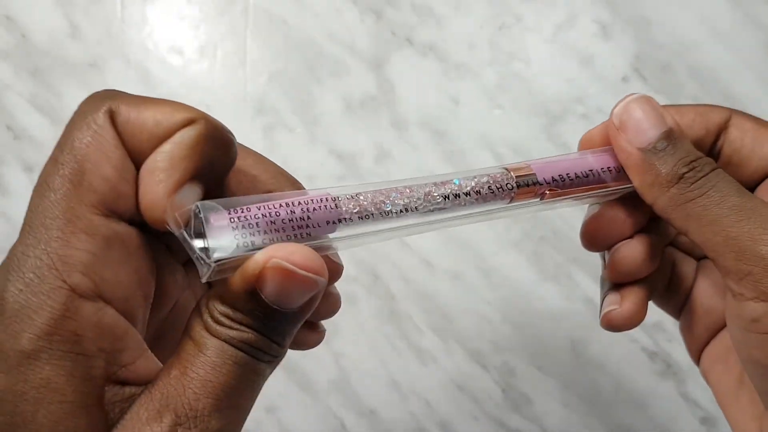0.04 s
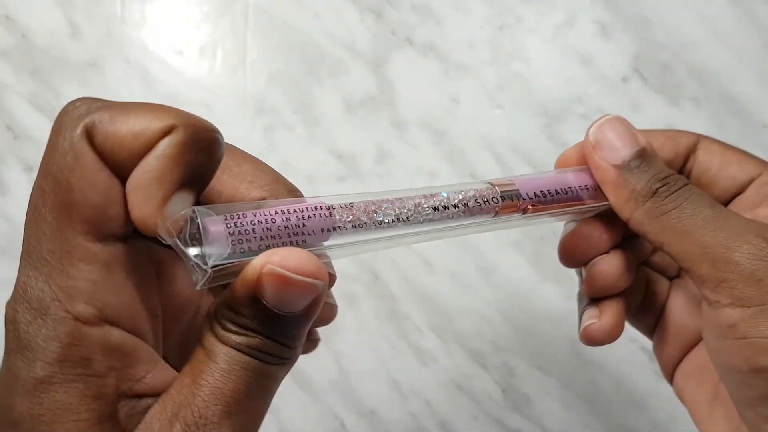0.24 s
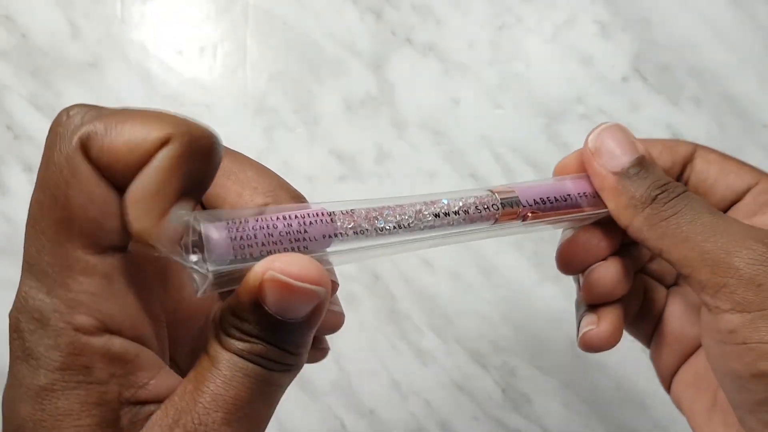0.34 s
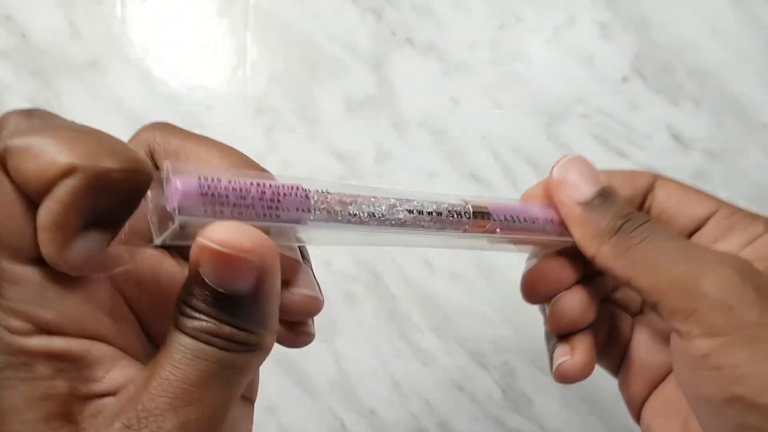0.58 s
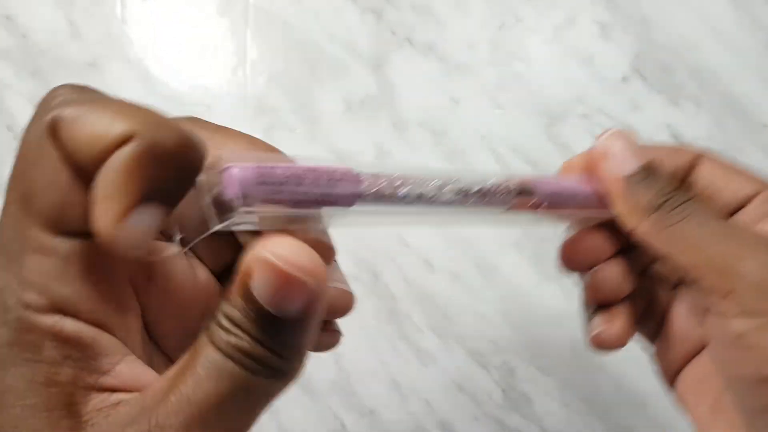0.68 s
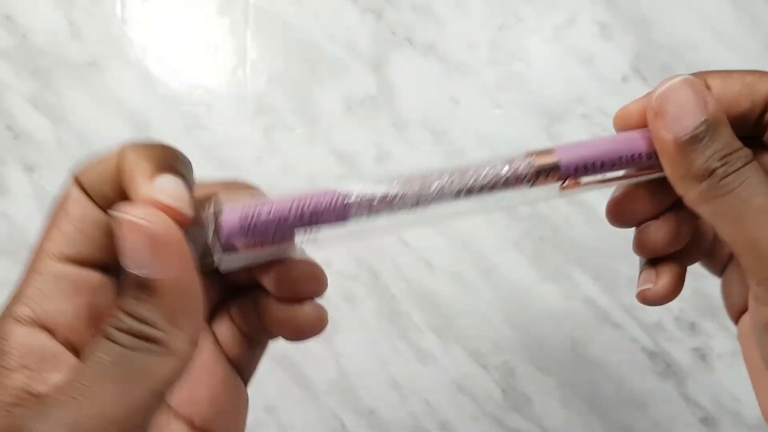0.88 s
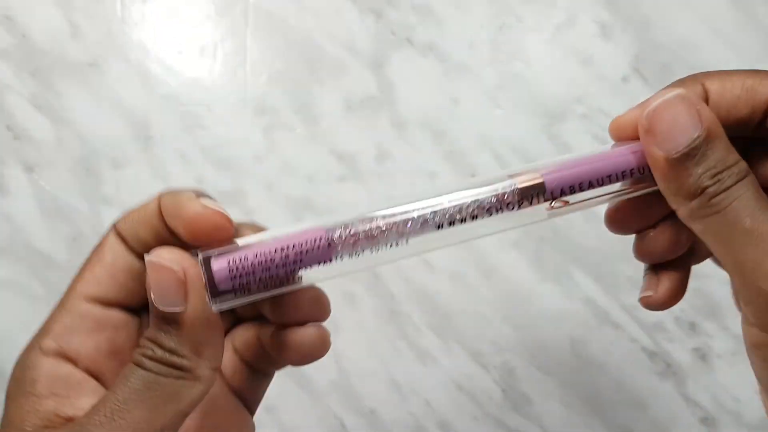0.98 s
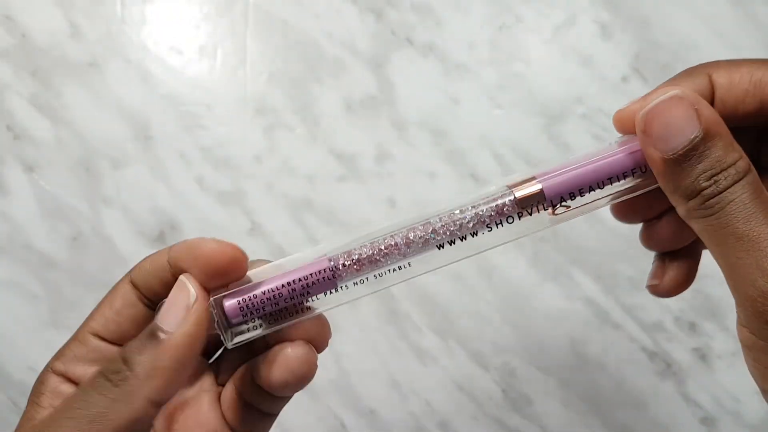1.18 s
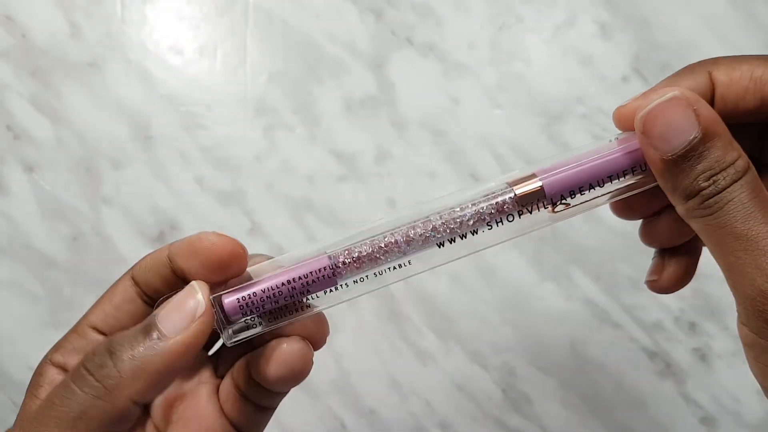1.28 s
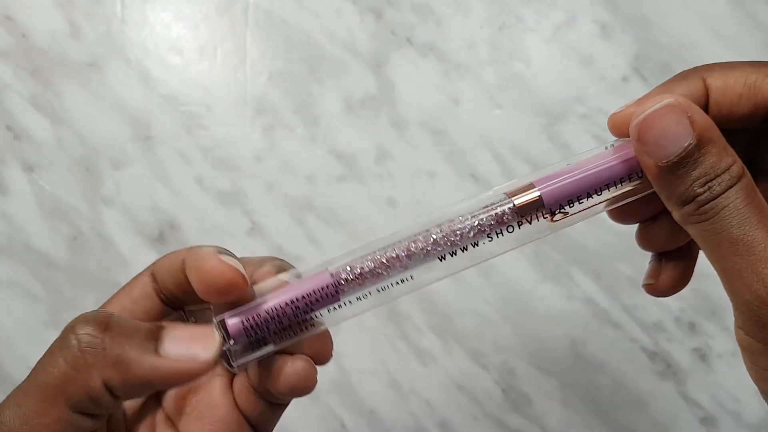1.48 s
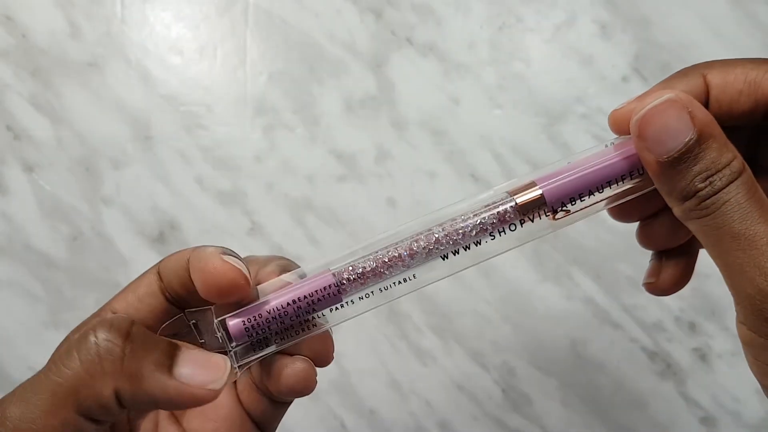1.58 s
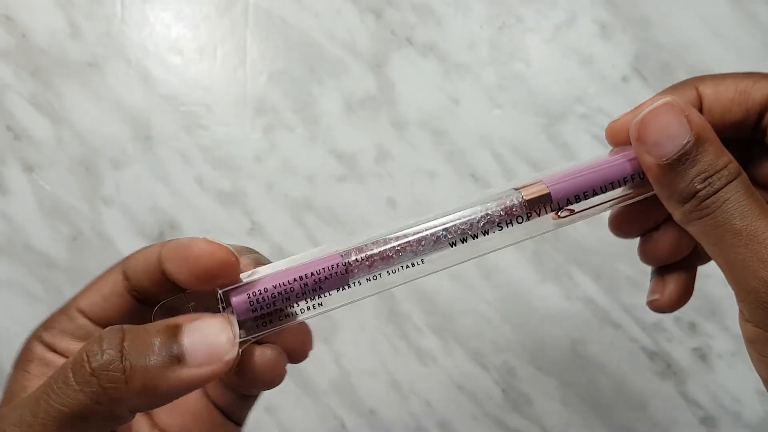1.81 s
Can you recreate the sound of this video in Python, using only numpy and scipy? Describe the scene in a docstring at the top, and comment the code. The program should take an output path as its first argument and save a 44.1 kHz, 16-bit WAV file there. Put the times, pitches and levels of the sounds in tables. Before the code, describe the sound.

Thin clear plastic box snaps sharply under fingernails, then faint ticks and finger rubs follow

```python
"""A low appliance drone over hiss and the dying room ring of a snap; then fingernails pry at a box flap.
The thin clear plastic pen box is held close to a phone: its buckling sheet snaps, slips driving decaying modes.
Rattles are fading showers of slips, finger slides gliding bands of noise grains, a faint thin tone narrow noise.
A small hard room answers with decaying noise bands; drone and hiss are shaped noise."""
import sys
import numpy as np
from scipy import signal
from scipy.fft import rfft, irfft
from scipy.io import wavfile
from scipy.ndimage import uniform_filter1d

SR = 44100
rng = np.random.default_rng(int(sys.argv[2]) if len(sys.argv) > 2 else 0)


def convert_level_to_amplitude(level_db):
    """Map a level in decibels to its linear amplitude factor."""
    exponent = np.asarray(level_db, float) / 20
    return 10 ** exponent


def inscribe(sig):
    """Save sig as 16-bit PCM at rate SR to the path in sys.argv[1].

    A 1-D sig is mono; a 2-D sig holds one channel per row.
    Samples are clipped to [-1, 1] before scaling.
    """
    pcm = np.round(np.clip(np.atleast_2d(sig).T, -1, 1) * 32767)
    wavfile.write(sys.argv[1], SR, pcm.astype(np.int16))


N = 81585
LEAD_S = 0.1  # time computed ahead of the start, then cut
RIGHT_SIGN = np.array([[1], [-1]])
IS_RIGHT = np.array([[0], [1]])  # right = far port


def unit(x):
    """Scales to rms 1."""
    return x / np.sqrt(np.mean(x ** 2))


def band(x, center_hz, width_hz):
    """Two-pole resonance, gain 1 at the centre."""
    center_hz_safe = min(center_hz, 0.45 * SR)
    b, a = signal.iirpeak(center_hz_safe, center_hz / width_hz, fs=SR)
    return signal.lfilter(b, a, x)


def double_band(x, center_hz, width_hz):
    """The same resonance twice, for steeper skirts."""
    return band(band(x, center_hz, width_hz), center_hz, width_hz)


def walk(rate_hz):
    """Random levels held 1 / rate_hz and slewed twice."""
    hold = int(SR / rate_hz)
    levels = np.repeat(rng.standard_normal(N // hold + 1), hold)
    slewed = uniform_filter1d(uniform_filter1d(levels, hold), hold)
    return 2.1 * slewed[:N]


def start_index(start_s):
    """Sample index of a time, counted from the start of the lead."""
    return int((start_s + LEAD_S) * SR)


# Colour of air and microphone hiss. Each row: frequency in Hz, relative density in dB per Hz.
HISS_COLOUR = [(15, -35), (26, -7.5), (56, 5.5), (152, 1), (215, 2), (320, 0.5), (495, -2.5), (780, -10.5),
               (1300, -14.5), (2050, -12), (3200, -17), (5000, -22.5), (8000, -30), (10000, -31),
               (13000, -24.5), (16200, -26)]
# Narrow wavering bands of the drone. Each row: centre in Hz, filter width in Hz, level in dB before the waver.
DRONE_BANDS = [(113, 13, -68), (146, 22, -67.5), (284, 37, -73.5)]


def background():
    """Air and microphone hiss, more alike in the bass, with the wavering noise bands of an appliance."""
    hiss_db, alike_below_hz, right_db, waver_db = -64, 900, -0.5, 3.1
    hz = np.maximum(np.fft.rfftfreq(N, 1 / SR), 1)
    colour_hz, colour_db = np.array(HISS_COLOUR).T
    colour = convert_level_to_amplitude(np.interp(np.log(hz), np.log(colour_hz), colour_db))
    mid, side = rfft(rng.standard_normal((2, N))) * colour
    side = side * np.clip(hz / alike_below_hz, 0.4, 1)
    out = convert_level_to_amplitude(hiss_db) * unit(irfft(np.array([mid + side, mid - side]), N))
    for center_hz, width_hz, db in DRONE_BANDS:
        noise = rng.standard_normal(N) + 0.3 * rng.standard_normal((2, N))
        level = convert_level_to_amplitude(db + waver_db * walk(5))
        out = out + level * unit(double_band(noise, center_hz, width_hz))
    return out * convert_level_to_amplitude(IS_RIGHT * right_db)


# Room tail. Each row: band centre in Hz, level in dB before doubling, t60 in seconds.
ROOM_BANDS = [(150, -53, 0.065), (401, -43, 0.23), (1000, -52, 0.26), (1940, -51, 0.25), (3060, -47, 0.23),
              (5100, -55, 0.33), (8900, -56.5, 0.29), (14010, -49, .21)]


def room(x):
    """Diffuse tail that starts at the first wall, each band dying at its own rate."""
    wall_s, wide_above_hz = 0.0027, 800
    t = np.arange(int(0.5 * SR)) / SR
    tail = 0
    for hz, db, t60_s in ROOM_BANDS:
        mid, side = rng.standard_normal((2, len(t)))
        noise = mid + min(hz / wide_above_hz, 1) * side * RIGHT_SIGN
        decay = 1000.0 ** (-t / t60_s)
        tail = tail + 2 * convert_level_to_amplitude(db) * double_band(noise, hz, 0.9 * hz) * decay
    tail = tail * np.clip(t / wall_s - 0.5, 0, 1)
    crossed = x.mean(axis=0, keepdims=True) + 0.5 * x[::-1]
    return signal.fftconvolve(crossed, tail, axes=1)[:, :x.shape[1]]


def ring(modes, slips):
    """Modes driven by slips, each with its own share of the energy; out at 0 dB if packed into 5 ms."""
    detune_share, scatter_db, right_late_s = 0.015, 1.2, 0.00016
    t = np.arange(slips.shape[1]) / SR
    hz, db, t60_s = np.array(modes, float).T[:, :, None]
    hz = hz * (1 + detune_share * rng.standard_normal(hz.shape))
    age_s = np.maximum(t - right_late_s * IS_RIGHT[:, :, None], 0)
    response = np.sin(2 * np.pi * hz * age_s) * 1000.0 ** (-age_s / t60_s)
    # axes: port, mode, time
    rung = signal.fftconvolve(response, slips[:, None], axes=2)[..., :len(t)]
    rung = rung / np.sqrt((rung ** 2).sum(axis=2, keepdims=True))
    sign = (-1.0) ** np.arange(len(modes))[:, None]
    level = convert_level_to_amplitude(db + scatter_db * rng.standard_normal((2, len(modes), 1)))
    hit = (sign * level * rung).sum(axis=1)
    return hit / np.sqrt((hit ** 2).sum(axis=1, keepdims=True) / (SR / 200))


# Modes of the box, low to high. Each row: frequency in Hz, relative level in dB, t60 in seconds.
THUD_MODES = [(151, -7, 0.0096), (324, -1, 0.0063), (664, 3.5, 0.0059)]
HOLLOW_MODES = [(813.5, -3, .009), (1090, -3.5, 0.0057), (1457, 1.5, 0.025), (1786, 1, 0.014)]
SHEET_MODES = [(2235, -3, 0.0089), (2474, -1.5, .006), (3208, 1, 0.0073), (3437, 0.5, .006),
               (4320, -9, 0.0029)]
CRACK_MODES = [(5320, -1, 0.002), (6550, -3, 0.0056), (7140, 0.5, 0.0014), (9500, 0.5, 0.0018),
               (10850, -3, 0.0033), (12710, -8.5, 0.0015), (13725, -6.5, 0.0065), (13800, -3, 0.00078)]
# Snaps and ticks of the sheet. Each row: start in seconds, level of the sheet modes in dB,
# then thud, hollow ring and bright crack in dB against that level.
SNAP_EVENTS = [(-.061, -24, -24, -8.5, -11), (0.2269, -17.5, -54, -11, -24.5),
               (0.2673, -19, -20.5, -4.5, -17.5), (0.3957, -18.5, -24.5, -17, -13.5),
               (0.3992, -24, -27.5, -11, 6), (0.5468, -19.5, -17, -13.5, -1.5), (.5498, -19, -12, -8, 2),
               (.5619, -33.5, -17, -11.5, -2.5), (.5749, -37, -11, -4, -2.5), (0.7278, -59, -17.5, -3.5, 1),
               (0.8817, -56, -16.5, 1.5, -1.5), (0.979, -51.5, -15, -2, -7.5),
               (1.0309, -64.5, -22.5, -1.5, -6.5), (1.1328, -64, -24, -11, -13), (1.2476, -63, 1.5, 4, -8),
               (1.2633, -65, -8.5, -1.5, 0.5), (1.2789, -61, -17, -7, -8), (.9545, -59.5, -15.5, -10, -2.5),
               (1.3522, -55.5, -1, 2.5, -1), (1.3628, -58, -1, 4, -6), (1.368, -61, 8.5, -3.5, -8),
               (1.6419, -67, -1.5, 1.5, -2), (1.7053, -67, -6.5, 4.5, -13.5),
               (1.7193, -35.5, -16, -11.5, -3.5), (1.8369, -56, -2.5, -0.5, -12)]


def snaps(size):
    """Each snap is a sudden slip and a few ms of smaller ones, ringing the box."""
    crumple_s, crumple_db, crumple_per_s = 0.0046, -4, 2600  # smaller slips: fade time, peak level, rate
    right_own = 0.82  # share of the small slips that only the far port hears
    right_db, right_thud_db, right_crack_db = -1, -3, -6.5  # thud and crack on top of right_db
    mic_low_hz = 70
    out, t = np.zeros((2, size)), np.arange(int(0.04 * SR)) / SR
    for start_s, db, thud_db, hollow_db, crack_db in SNAP_EVENTS:
        chance, strength = rng.random((2, 2, len(t)))
        slips = (chance < crumple_per_s / SR) * (2 * strength - 1) * convert_level_to_amplitude(crumple_db)
        slips[1] = slips[0] + right_own * (slips[1] - slips[0])
        slips[:, 0] = 1  # the sudden slip
        low = slips * np.exp(-(t / crumple_s) ** 4)
        high = slips * np.exp(-t / (0.7 * crumple_s))
        hit = convert_level_to_amplitude(thud_db + IS_RIGHT * right_thud_db) * ring(THUD_MODES, low)
        hit = hit + convert_level_to_amplitude(hollow_db) * ring(HOLLOW_MODES, low)
        hit = hit + ring(SHEET_MODES, low)
        hit = hit + convert_level_to_amplitude(crack_db + IS_RIGHT * right_crack_db) * ring(CRACK_MODES, high)
        i = start_index(start_s)
        n = min(len(t), size - i)
        out[:, i:i + n] += convert_level_to_amplitude(db + IS_RIGHT * right_db) * hit[:, :n]
    low_cut = signal.butter(2, mic_low_hz, "high", fs=SR, output="sos")
    return signal.sosfilt(low_cut, out)


# The freed flap rattles on after the big snaps. Each row: start in seconds, level of the sheet modes in dB,
# crack in dB against it, t60 of the slips in seconds.
RATTLE_EVENTS = [(.401, -37, -0.5, .08), (.553, -26.5, 4.5, 0.16)]


def rattles(size):
    """A fading shower of tiny slips through the sheet, hollow and crack modes."""
    grain_db, hollow_db = 5.5, -4.5
    out, t = np.zeros((2, size)), np.arange(int(0.12 * SR)) / SR
    for start_s, db, crack_db, t60_s in RATTLE_EVENTS:
        bursts = convert_level_to_amplitude(grain_db * rng.exponential(size=len(t)))
        slips = rng.standard_normal((2, len(t))) * bursts * 1000.0 ** (-t / t60_s)
        hit = ring(SHEET_MODES, slips)
        hit = hit + convert_level_to_amplitude(hollow_db) * ring(HOLLOW_MODES, slips)
        hit = hit + convert_level_to_amplitude(crack_db) * ring(CRACK_MODES, slips)
        i = start_index(start_s)
        out[:, i:i + len(t)] += convert_level_to_amplitude(db) * hit
    return out


# Skin sliding on the sheet. Each row: start in seconds, length in seconds, first centre in Hz,
# last centre in Hz, filter width as share of the centre, level in dB before the swell.
SLIDE_EVENTS = [(.685, .045, 1100, 950, 1.54, -60), (.835, .045, 850, 780, 0.43, -69),
                (.911, .027, 12100, 11870, .25, -67), (.945, .018, 3630, 3100, 1.4, -61.5),
                (.95, .025, 1500, 1460, 0.25, -64), (1.111, .04, 10500, 1400, .35, -63.5),
                (1.195, .025, 3020, 3000, 1.6, -73), (1.354, 0.027, 1580, 985, 0.97, -60.5),
                (1.812, .022, 3000, 1400, 1.9, -59)]


def slides(size):
    """Dense stick-slip grains whose colour glides as the finger moves."""
    grain_db = 3
    out = np.zeros((2, size))
    for start_s, length_s, first_hz, last_hz, width_share, db in SLIDE_EVENTS:
        n = int(length_s * SR)
        u = np.arange(n) / n
        grains = rng.standard_normal((2, n)) * convert_level_to_amplitude(grain_db * rng.exponential(size=n))
        grains[1] = 0.42 * grains[0] + 0.67 * grains[1]
        rub = 0
        for place in np.linspace(0, 1, 6):  # crossfade through six filters
            hz = first_hz * (last_hz / first_hz) ** place
            fade = np.maximum(1 - abs(u - place) * 5, 0)
            rub = rub + fade * unit(double_band(grains, hz, width_share * hz))
        i = start_index(start_s)
        out[:, i:i + n] += convert_level_to_amplitude(db) * rub * np.sin(np.pi * u) ** 0.76
    return out


# Faint thin tone. One row: start in seconds, length in seconds, centre in Hz, width in Hz,
# level in dB before the swell.
SQUEAK_TONE = (1.43, .12, 3900, 60, -81)


def squeak():
    """A faint tone of narrow-band noise that swells and fades."""
    start_s, length_s, hz, width_hz, db = SQUEAK_TONE
    u = np.clip((np.arange(N) / SR - start_s) / length_s, 0, 1)
    swell = np.sqrt(np.abs(np.sin(np.pi * u)))
    return convert_level_to_amplitude(db) * unit(band(rng.standard_normal(N), hz, width_hz)) * swell


def scene():
    """Box and fingers with their room tail, over the background and the thin tone."""
    lead = int(LEAD_S * SR)
    near = snaps(N + lead) + rattles(N + lead) + slides(N + lead)
    return (near + room(near))[:, lead:] + background() + squeak()


def band_limit(x):
    """A steep low-pass at the top of the band."""
    return signal.sosfilt(signal.butter(12, 16520, fs=SR, output="sos"), x)


def record(dry):
    """The phone clips at full scale."""
    mix = np.clip(dry, -1, 1)
    return band_limit(mix)


dry = scene()
out = record(dry)
inscribe(out)
```